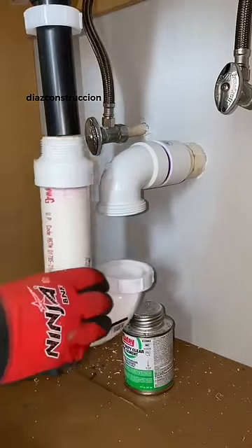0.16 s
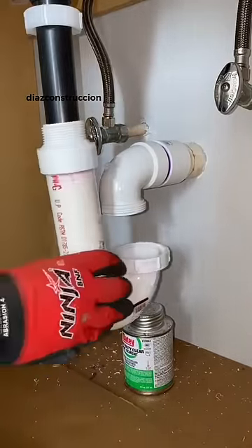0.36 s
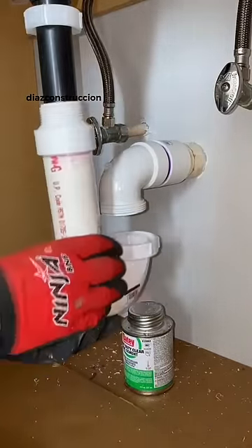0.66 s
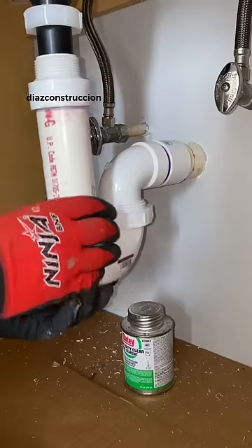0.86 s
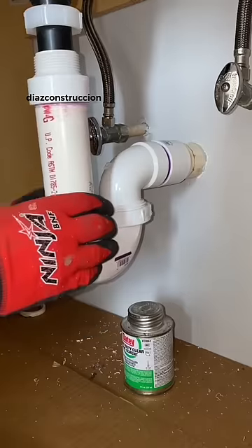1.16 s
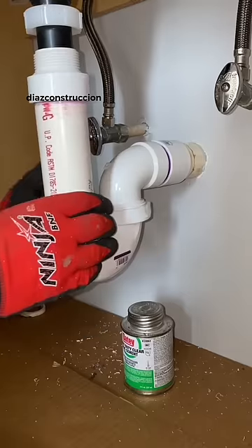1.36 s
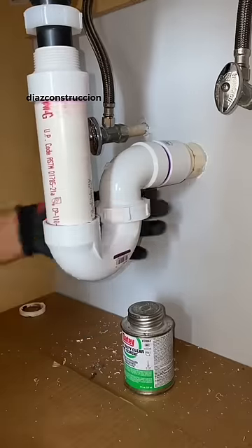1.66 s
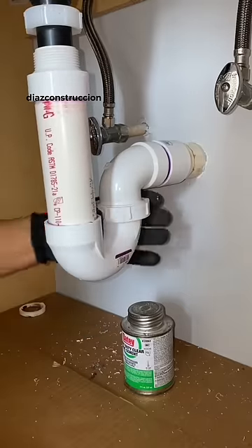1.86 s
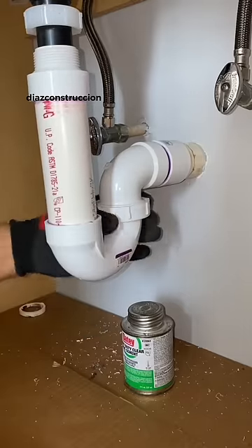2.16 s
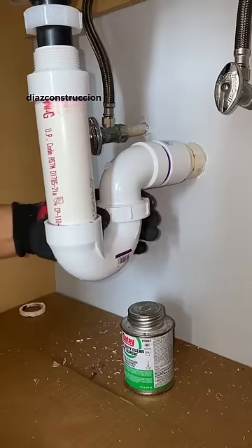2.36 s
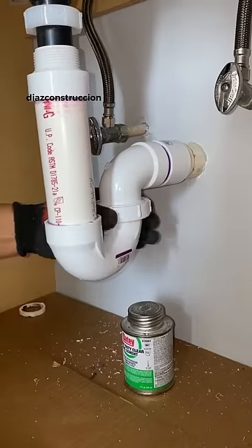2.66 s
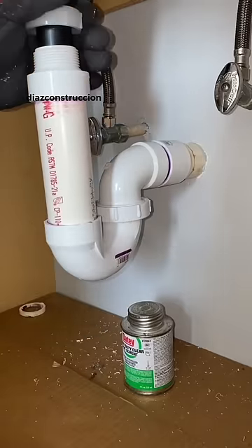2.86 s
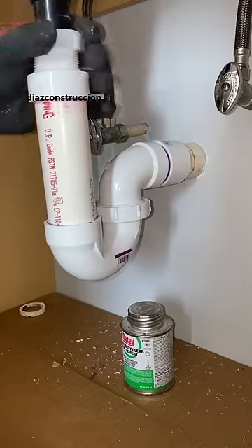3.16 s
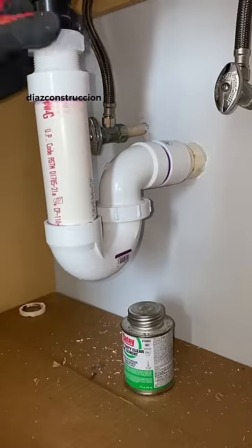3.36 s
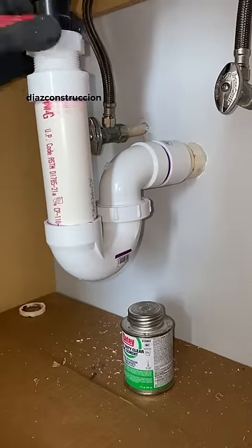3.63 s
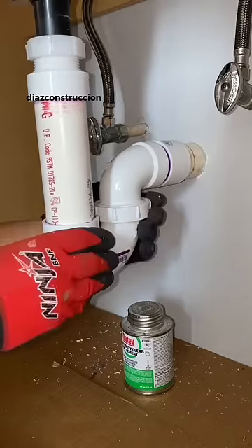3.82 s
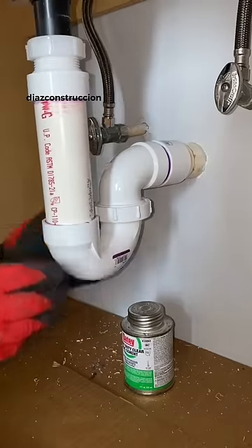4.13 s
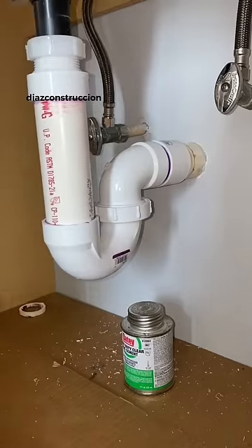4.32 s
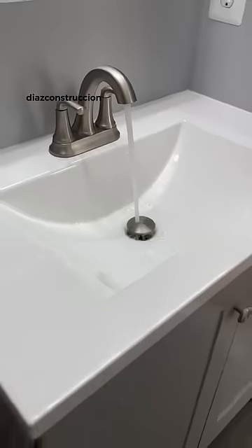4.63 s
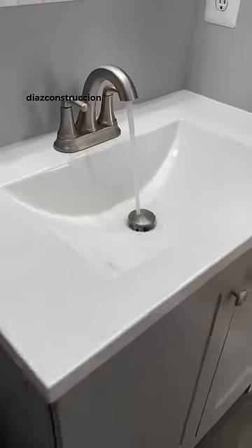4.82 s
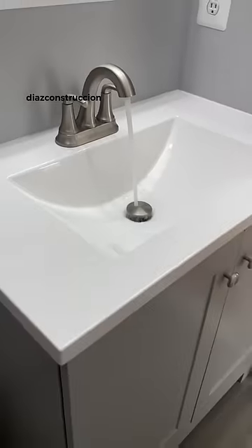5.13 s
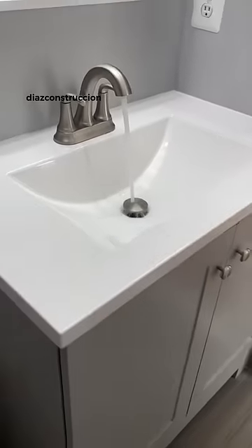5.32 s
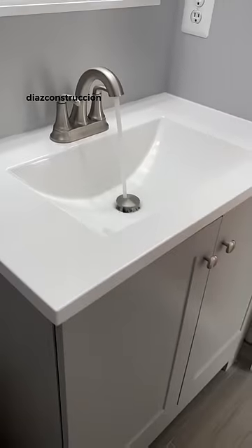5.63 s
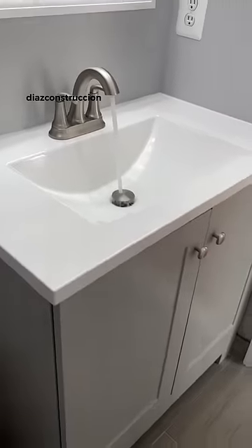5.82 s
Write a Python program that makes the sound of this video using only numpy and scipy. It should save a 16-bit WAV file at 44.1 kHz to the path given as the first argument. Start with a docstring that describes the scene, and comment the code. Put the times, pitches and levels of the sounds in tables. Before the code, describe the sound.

Light knocks, clicks and scrapes of plastic pipe fittings inside a cabinet, followed by the steady hiss of tap water in a basin.

```python
"""Plastic drain pipes are pushed together and their nuts turned inside a wooden sink cabinet.
Each knock rings the cabinet, the pipe wall and the air in the pipe; gloves rub and sliding pipes hum.
After a quiet moment with a low rumble, a tap runs into a basin: the jet fizzes, droplets splash
and the drain drones. Two microphones, left and right, hear it all a little differently."""
import sys
import numpy as np
from scipy import signal
from scipy.fft import rfft, irfft
from scipy.io import wavfile
from scipy.ndimage import uniform_filter1d

SR = 44100
rng = np.random.default_rng(int(sys.argv[2]) if len(sys.argv) > 2 else 0)


def store_pcm(level_fs):
    """Save levels as 16-bit WAV."""
    pcm = np.round(np.clip(level_fs, -1, 1) * 32767).astype(np.int16)
    wavfile.write(sys.argv[1], SR, np.atleast_2d(pcm).T)


N = 263982
TOP_HZ = 16650  # the highest pitch let through

# The tones of each part that rings. Each row: pitch in Hz, relative level in dB, seconds to fade 60 dB.
CABINET_TONES = [(145.1, -5, 0.27), (155, -3.5, 0.25), (188.5, 3, 0.16), (207.8, 2.5, 0.11)]
PIPE_WALL_TONES = [(291, 5.5, 0.085), (336.4, 7.5, 0.061), (401.7, 0, 0.063), (463.7, -6.5, .055),
                   (535.5, -8.5, 0.1)]
PIPE_AIR_TONES = [(615, -9, .05), (685, 0, .09), (860, -14, .05), (990, -16, .07)]
FITTING_TONES = [(1240, -3, .045), (1390, -4, .06), (1550, -2, .03), (2130, 1, .028), (2430, -6, .035),
                 (3350, -5, .025)]
RIM_TONES = [(5900, -4, .018), (7850, -9, .015), (8900, -7, .015), (10400, 1, .018), (14800, -6, .012)]
# Plastic hits plastic; the first row, at 0 s, is a faint thump as the scene opens. Each row: start in seconds,
# then levels in dB of the cabinet thump, pipe wall, pipe air and dull crack, and last the bright click in dB
# relative to the crack.
BLOWS = [(0.0, -25.5, -43, -44, -51, -8.5), (0.181, -21, -14, -17.5, -33, -16.5),
         (0.215, -27, -21, -37, -49.5, -19), (0.245, -46, -27, -32.5, -53.5, -19),
         (0.453, -36, -59, -46, -45.5, -28), (0.644, -27, -63, -66, -75, -10),
         (0.859, -29, -39, -18.5, -35, -4), (0.867, -16.5, -8.5, -17.5, -24, 2),
         (0.929, -16, -17, -41, -38.5, -22), (0.941, -44, -30, -34, -45.5, -18),
         (1.033, -33, -26.5, -55, -60, -13), (1.11, -32, -28, -37.5, -41, -13),
         (1.125, -31, -19, -47, -48.5, -20), (1.214, -54, -13, -32, -37, -6),
         (1.223, -23, -36.5, -42, -31, -9.5), (1.243, -24, -13, -44, -62, -12.5),
         (1.324, -42, -9.5, -24.5, -19, -3.5), (1.359, -23, -29.5, -39, -33.5, -14),
         (1.392, -37, -11, -42, -30.5, 0), (1.401, -20, -35, -31, -20.5, -12.5),
         (1.414, -13.5, -12, -35, -25.5, -7.5), (1.43, -16, -5.5, -16.5, -22.5, -3),
         (1.453, -12, -17.5, -24.5, -31.5, -19), (1.549, -6.5, -8, -26, -27.5, -13.5),
         (1.684, -26.5, -30, -36, -46.5, -16), (1.759, -24.5, -21, -37, -43, -15),
         (1.778, -45, -24, -40, -53, -8), (1.842, -38, -35, -45, -48.5, -18),
         (1.88, -17.5, -22, -43, -54, -12), (1.899, -32, -25, -39, -51.5, 1),
         (1.924, -23, -31, -41, -40.5, -16), (2.099, -14.5, -23.5, -41, -56, -21),
         (2.116, -18, -16, -30.5, -36.5, -11), (2.132, -12, -19.5, -35, -53, -24),
         (2.159, -10.5, -12, -41, -33, -15), (2.257, -50, -76, -69, -54, -5.5),
         (2.273, -30, -29.5, -56, -75, -18), (2.336, -23.5, -34, -58, -83, -20),
         (2.358, -45, -57, -46, -44, -34), (2.406, -7.5, -12.5, -38, -48, -18),
         (2.426, -4, -13.5, -29.5, -28.5, -13), (2.597, -21, -27.5, -46, -54, -14),
         (2.625, -9.5, -13, -32.5, -34, -18), (2.641, -17.5, -19.5, -50, -38.5, -17.5),
         (2.922, -44, -24.5, -63, -49, 0), (2.976, -13, -20.5, -37.5, -34.5, -5.5),
         (3.114, -31, -41, -61, -65, -13), (3.14, -42, -42, -50, -55, -15),
         (3.21, -28.5, -34, -66, -69, -15), (3.348, -28, -39, -52, -78, -21),
         (3.391, -40, -33.5, -60, -66, -17), (3.478, -25, -29, -59, -79, -22),
         (3.624, -30, -38, -55, -85, -21), (3.755, -31, -34.5, -60, -79.5, -21.5),
         (3.942, -42, -35.5, -62.5, -56.5, 1), (3.974, -28.5, -35, -41.5, -42.5, -15)]
# Hands hold the pipes. Each row: time in seconds, grip rumble in dB, glove rustle in dB.
HANDLING = [(0.0, -53.5, -95), (0.23, -44, -99), (0.36, -42, -87), (0.76, -47, -80), (1.38, -31, -59),
            (1.96, -46, -70), (2.54, -36, -68.5), (2.76, -44, -73.5), (3.17, -48, -66.5), (4.02, -49, -78)]


def gain_of(db):
    """Turns decibels into a factor to multiply by."""
    return 10 ** (np.asarray(db) / 20)


def evened(x):
    """Scales a signal to an average (rms) level of 1."""
    return x / np.sqrt(np.mean(x ** 2) + 1e-20)


def value_at(points, hz):
    """Looks up a table between its rows, on a musical (logarithmic) pitch scale."""
    pitches, values = np.transpose(points)
    return np.interp(np.log(hz + 1), np.log(pitches + 1), values)


def add(mix, start, sound):
    """Mixes a sound in at a start time in seconds."""
    part = mix[round(start * SR):][:len(sound)]
    part += sound[:len(part)]


def level_curves(rows, fade_s=0.0011):
    """One loudness curve for each dB column of a table, silent outside its times."""
    times, *columns = np.transpose(rows)
    t = np.arange(N) / SR
    inside = np.clip((t - times[0]) / fade_s, 0, 1) * np.clip((times[-1] + fade_s - t) / fade_s, 0, 1)
    return [inside * gain_of(np.interp(t, times, db)) for db in columns]


def hiss(spectrum, patchy_db, flicker_db, far=False, top_hz=TOP_HZ):
    """Left and right noise that flickers, with drifting louder and softer patches of pitch."""
    # Near and far sounds. Each row: pitch in Hz, how alike the two sides are (1 same, 0 unrelated).
    alike_near = [(300, .99), (1220, .88), (2500, .6), (7500, .25), (10500, .4), (13500, -.2)]
    alike_far = [(100, .9), (250, .8), (500, .2), (5500, .2), (10000, .9)]
    # Far sounds only. Each row: pitch in Hz, how far the left wave is ahead in radians.
    left_lead = [(60, 0), (3000, 1.0), (6400, .1), (8500, -3.14), (9700, -6.1), (10400, -6.4),
                 (11600, -9.3), (12500, -9.5), (13500, -12.5), (14800, -12.6), (15300, -15.7)]
    # Far sounds only. Each row: pitch in Hz, how much louder the left is in dB.
    left_louder = [(700, -0.5), (5500, 2.5), (8000, 0)]
    frames, hz = N // 128 + 5, np.fft.rfftfreq(512, 1 / SR)
    a, b, c, d, patches = rng.standard_normal((frames, 257, 5)).T
    left, unrelated = a + 1j * b, c + 1j * d
    patches = evened(uniform_filter1d(uniform_filter1d(patches, size=6, axis=0), size=16, axis=1))
    flicker = evened(uniform_filter1d(rng.standard_normal(frames), size=3))
    alike = np.clip(value_at(alike_far if far else alike_near, hz), -1, 1)[:, None]
    lag = np.exp(-1j * far * value_at(left_lead, hz))[:, None]
    sides = np.array([left, alike * lag * left + np.sqrt(1 - alike ** 2) * unrelated])
    sides *= gain_of(far * np.array([.5, -.5])[:, None] * value_at(left_louder, hz))[..., None]
    sides *= gain_of(value_at(spectrum, hz)[:, None] + patchy_db * patches + flicker_db * flicker)
    sides *= (hz < top_hz)[:, None]
    return evened(signal.istft(sides, nperseg=512, noverlap=384)[1][:, :N])


def shaped(x, spectrum):
    """Makes each pitch louder or softer. Each row: pitch in Hz, gain in dB."""
    return irfft(rfft(x) * gain_of(value_at(spectrum, np.fft.rfftfreq(N, 1 / SR))), N)


def ringing_noise(peaks):
    """Noise that rings at a few pitches. Each row: pitch in Hz, width in Hz, relative level in dB."""
    hz = np.fft.rfftfreq(N, 1 / SR)
    shape = sum(gain_of(db) / (1 + (2 * (hz - pitch) / width) ** 2) for pitch, width, db in peaks)
    return evened(irfft(rfft(rng.standard_normal(N)) * shape, N))


def ring(tones, chance, spread_db, detune, rise_s):
    """Fading tones after one blow, peak 1; where it lands shifts their levels and pitches by chance."""
    hz, db, fade_s = np.transpose(tones)[..., None]
    t = np.arange(SR // 4) / SR
    share, shift = chance[:len(tones), None], chance[-len(tones):, None]
    levels = gain_of(db + spread_db * share - 60 * t / fade_s)
    waves = levels * np.sin(2 * np.pi * hz * (1 + detune * shift) * t)
    sound = waves.sum(0) * (1 - np.exp(-t / rise_s))
    return sound / abs(sound).max()


def knocks():
    """Each blow rings the hollow fittings, then the pipe air, pipe wall and cabinet, the bass last."""
    bodies, rises_s, lag_s = (CABINET_TONES, PIPE_WALL_TONES, PIPE_AIR_TONES), (.0025, .002, .001), .003
    out, chances = np.zeros(N), rng.standard_normal((len(BLOWS), 4, 12))
    for (start, *body_dbs, crack_db, _), chance in zip(BLOWS, chances):
        for tones, db, where, rise_s in zip(bodies, body_dbs, chance, rises_s):
            body = ring(tones, where, spread_db=2.5, detune=.018, rise_s=rise_s)
            add(out, start + lag_s, gain_of(db) * body)
        fitting = ring(FITTING_TONES, chance[3], spread_db=5, detune=.045, rise_s=.001)
        add(out, start, gain_of(crack_db + 1.5) * fitting)
    return out


def clicks():
    """Damped plastic hardly rings: a burst of noise, then a weaker tail from the cabinet walls."""
    # The dull crack and the bright click. Each row: pitch in Hz, relative level in dB.
    crack_spectrum = [(500, -9), (900, -0.5), (2200, -5.5), (3600, -9), (8000, -34.5)]
    click_spectrum = [(1500, -40), (3000, -6), (5500, 2.5), (7500, -1.5), (10000, -1.5), (13000, -6),
                      (16000, -16)]
    dull, bright, t = np.zeros(N), np.zeros(N), np.arange(SR // 4) / SR
    touch = 1 - np.exp(-t / .0009)  # the surfaces take a moment to meet fully
    crack_shape = touch * (gain_of(-1 - 60 * t / .021) + gain_of(-11.5 - 60 * t / .16))
    click_shape = touch * (gain_of(3 - 60 * t / .028) + gain_of(-13.5 - 60 * t / .14))
    for start, *_, crack_db, bright_db in BLOWS:
        add(dull, start, gain_of(crack_db) * crack_shape)
        add(bright, start, gain_of(crack_db + bright_db) * click_shape)
    crack = hiss(crack_spectrum, patchy_db=.7, flicker_db=.7)
    click = hiss(click_spectrum, patchy_db=.7, flicker_db=.7)
    return dull * crack + bright * click


def rim_pings():
    """The hard edges ping very briefly at each blow, differently on the left and right."""
    out, chances = np.zeros((2, N)), rng.standard_normal((len(BLOWS), 2, 10))
    for (start, *_, crack_db, bright_db), chance in zip(BLOWS, chances):
        for side, where in zip(out, chance):
            ping = ring(RIM_TONES, where, spread_db=4, detune=.015, rise_s=.0008)
            add(side, start, gain_of(crack_db + bright_db + 4.5) * ping)
    return out


def grip():
    """Many small slips of gloves and screw threads shake pipes and cabinet and scuff the plastic."""
    # Gloves on the pipe wall. Each row: pitch in Hz, relative level in dB.
    scuff_spectrum = [(500, -5.5), (1200, -5.5), (4000, -32)]
    slips_per_s = 400
    slips = (rng.random(N) < slips_per_s / SR) * rng.standard_normal(N)
    slips *= gain_of(2.5 * rng.exponential(1, N).clip(0, 4))  # a few slip harder
    parts = (CABINET_TONES, 0), (PIPE_WALL_TONES, -4), (PIPE_AIR_TONES, -18), (FITTING_TONES, -29)
    body = sum(gain_of(db) * ring(tones, np.zeros(12), 0, 0, rise_s=.0043) for tones, db in parts)
    rumble = evened(signal.oaconvolve(slips, body)[:N])
    scuff = hiss(scuff_spectrum, patchy_db=2.5, flicker_db=3.5)[0]
    return level_curves(HANDLING)[0] * (rumble + gain_of(-23.5) * scuff)


def cabinet(x):
    """The cabinet gives off little deep bass; its walls echo a little differently to each side."""
    # The part of the echo that differs between the sides. Each row: pitch in Hz, gain in dB.
    wall_echo = [(300, -54.5), (500, -28), (1200, -3)]
    bass_cut_hz, echo_s = 154.3, .06
    x = signal.sosfilt(signal.butter(4, bass_cut_hz, "high", fs=SR, output="sos"), x) + gain_of(-31) * x
    echo = rng.standard_normal(2000) * gain_of(-60 * np.arange(2000) / SR / echo_s)
    wide = shaped(signal.oaconvolve(x, echo / np.linalg.norm(echo))[:N], wall_echo)
    return np.array([x + wide, x - wide])


def room_tone():
    """A faint, steady, low noise fills the room."""
    # Each row: pitch in Hz, relative level in dB.
    spectrum = [(20, -7.5), (100, 5.5), (400, -70.5)]
    return gain_of(-68.5) * evened(shaped(rng.standard_normal(N), spectrum))


def rubbing():
    """Dry glove hiss swells with every stroke, which also rings the plastic and hums the air in the pipe."""
    # A pipe slides. Each row: start in seconds, length in seconds, hiss in dB, hum in dB.
    slides = [(0.286, 0.16, -50.5, -45.5), (0.35, 0.28, -63, -40), (0.614, 0.088, -50, -78),
              (0.695, 0.1, -50.5, -77), (1.067, 0.12, -54, -49.5), (1.22, 0.081, -59, -32),
              (1.277, 0.016, -56, -57), (1.378, 0.055, -56, -33.5), (1.569, 0.024, -45.5, -61),
              (1.835, 0.19, -60.5, -45), (2.102, 0.13, -63.5, -30.5), (2.936, 0.075, -53, -70)]
    # The upper nut is spun down its thread. Each row: start in seconds, length in seconds, hiss in dB.
    twists = [(3.105, 0.079, -63.5), (3.244, 0.069, -59.5), (3.366, 0.086, -60.5), (3.49, 0.11, -61),
              (3.632, 0.096, -60.5), (3.773, 0.036, -63)]
    # The dry hiss. Each row: pitch in Hz, relative level in dB.
    rub_spectrum = [(290, -45), (500, -3.5), (670, -14), (1200, -17.5), (2000, -20), (16400, -21.5)]
    pipe_hz, twist_hum_db, rise_share = 343, -78, .38
    rub_level, hum_level = np.zeros((2, N))
    for start, length, hiss_db, hum_db in slides + [(*row, twist_hum_db) for row in twists]:
        along = np.linspace(0, 1, round(length * SR))
        swell = np.sin(np.pi / 2 * np.minimum(along / rise_share, (1 - along) / (1 - rise_share))) ** 2
        add(rub_level, start, gain_of(hiss_db) * swell)
        add(hum_level, start, gain_of(hum_db) * swell)
    grit = gain_of(.5 * evened(uniform_filter1d(rng.standard_normal(N), size=60)))  # uneven slipping
    # air in an open pipe rings at multiples of its lowest pitch; higher ones are weaker and wider
    hum = ringing_noise([(k * pipe_hz, 30 * k - 8, -17 * np.log2(k) ** .85) for k in range(1, 7)])
    rub = hiss(rub_spectrum, patchy_db=1.8, flicker_db=2.5, top_hz=16000)
    shell = gain_of(-13.5) * ringing_noise([(hz, 400, 0) for hz, *_ in FITTING_TONES[-1:] + RIM_TONES[:2]])
    rustle = level_curves(HANDLING)[1] * rub
    return grit * (rustle + rub_level * (rub + shell)) + hum_level * hum


def quiet_moment():
    """A low rumble and a faint, dull hiss sink and then creep back up."""
    # Each row: time in seconds, rumble in dB, hiss in dB.
    levels = [(3.99, -40.5, -62), (4.04, -50.5, -73), (4.2, -57.5, -70.5), (4.4, -53.5, -59.5),
              (4.468, -50, -61)]
    # The rumble and the distant hiss. Each row: pitch in Hz, relative level in dB.
    rumble_spectrum = [(20, -36), (55, -6), (68, 0), (120, -28), (450, -32), (1500, -56)]
    hiss_spectrum = [(400, 16), (1000, -6), (6000, -3.5), (12000, -10)]
    rumble_level, hiss_level = level_curves(levels)
    distant = hiss(hiss_spectrum, patchy_db=1, flicker_db=1, far=True, top_hz=11300)
    rumble = evened(shaped(rng.standard_normal(N), rumble_spectrum))
    return rumble_level * rumble + hiss_level * distant


def tap(start_s=4.462):
    """The sound of an already running tap, jet and drain together, comes in abruptly and goes on."""
    since = np.arange(N) / SR - start_s
    running = np.clip(since / .0018, 0, 1)
    jet_level = gain_of(-33 - .4 * since)  # sinks 0.4 dB a second
    return running * (drain() + jet_level * water_jet())


def drain():
    """The drain drones at a few low pitches, wavering a little and swelling briefly twice."""
    # Each row: pitch in Hz, width in Hz, relative level in dB.
    drain_tones = [(145.7, 6.4, -1.5), (189.4, 30, 2.5), (277, 24, -6.5)]
    # Each row: time of the swell's peak in seconds, level in dB.
    swells = [(4.81, -51), (5.571, -54)]
    drone_db, waver_db, swell_s = -55, 1, .065
    t = np.arange(N) / SR
    waver = evened(uniform_filter1d(uniform_filter1d(rng.standard_normal(N), size=3000), size=3000))
    level = gain_of(drone_db + waver_db * waver)
    level += sum(gain_of(db) * np.exp(-((t - peak) / swell_s) ** 2) for peak, db in swells)
    return level * ringing_noise(drain_tones) * gain_of([[-1.2], [1.2]])  # louder on the right


def water_jet():
    """Water mixed with air fizzes on the basin and makes it ring; the hard room walls echo."""
    # The fizz. Each row: pitch in Hz, relative level in dB.
    jet_spectrum = [(50, -7.5), (130, -3.5), (330, -16), (1000, -13.5), (2300, -10), (5200, -3),
                    (8400, -1.5), (10500, 2.5), (13000, -1), (15000, -10), (15700, -54)]
    # Each row: pitch in Hz, width in Hz, relative level in dB.
    basin_tones = [(547, 17, -4.5), (648, 104, -4), (1093, 56, -5), (1274, 68, -10.5)]
    echo_db, echo_s = -5, .25
    fizz = hiss(jet_spectrum, patchy_db=1.5, flicker_db=.7, far=True, top_hz=15720)
    echo = rng.standard_normal(SR // 4) * gain_of(-60 * np.arange(SR // 4) / SR / echo_s)
    water = fizz + gain_of(-29) * ringing_noise(basin_tones) + gain_of(-19) * splashes()
    walls = signal.oaconvolve(water, echo[None] / np.linalg.norm(echo), axes=1)[:, :N]
    return evened(water + gain_of(echo_db) * walls)


def splashes(drops_per_s=900):
    """Droplets ring for a moment, rising in pitch, each on the left or the right."""
    out, t = np.zeros((2, N)), np.arange(400) / SR
    pitches = np.geomspace(1500, 6500, 24)
    odds = drops_per_s / (2 * len(pitches)) / SR
    for hz in pitches:
        level = gain_of(-60 * t * hz / 40) * (1 - np.exp(-t * hz))
        drop = level * np.sin(2 * np.pi * hz * t * (1 + 9.2 * t))
        sizes = (rng.random((2, N)) < odds) * rng.exponential(1, (2, N))
        out += np.sqrt(hz) * signal.oaconvolve(sizes, drop[None], axes=1)[:, :N]
    return evened(out)


def scene():
    """The pipe work, the quiet moment and then the tap, over a faint room tone."""
    pipes_end_s, stop_db_per_s = 4.0, -1000
    room = room_tone()
    pipes = cabinet(knocks() + grip()) + clicks() + rim_pings() + rubbing()
    sudden_stop = gain_of(stop_db_per_s * np.maximum(np.arange(N) / SR - pipes_end_s, 0))
    return pipes * sudden_stop + quiet_moment() + tap() + room


def record(dry):
    """Cuts off the very highest treble."""
    return signal.oaconvolve(dry, signal.firwin(511, TOP_HZ, window=("kaiser", 9), fs=SR)[None], "same")


dry = scene()
out = record(dry)
store_pcm(out)
```